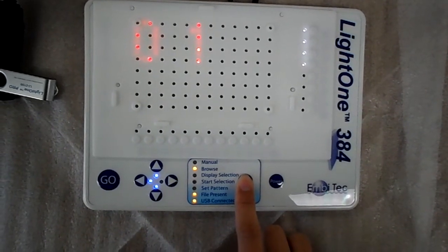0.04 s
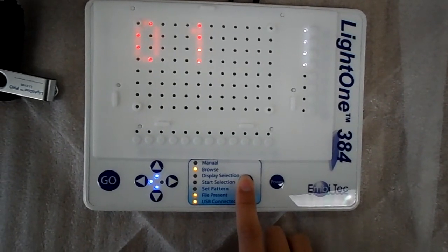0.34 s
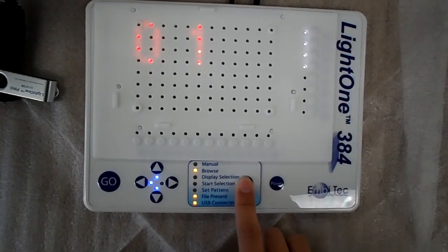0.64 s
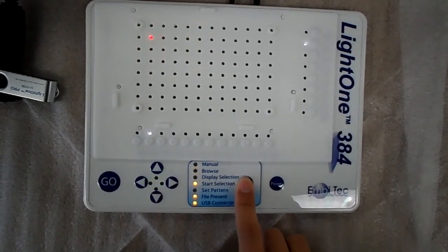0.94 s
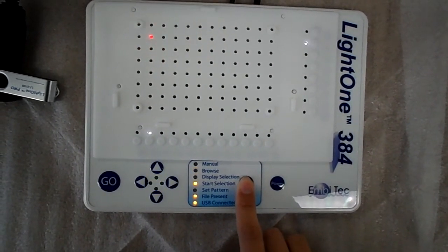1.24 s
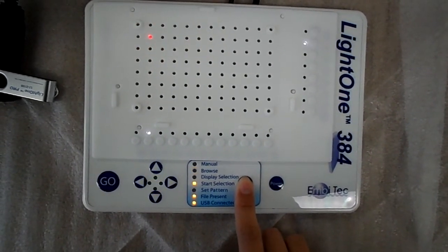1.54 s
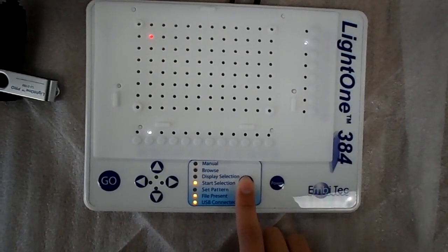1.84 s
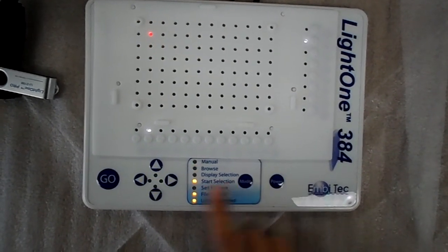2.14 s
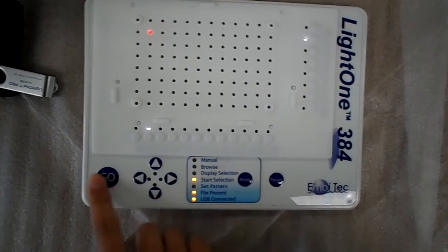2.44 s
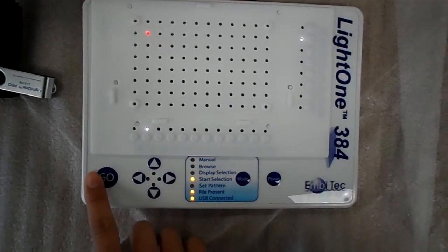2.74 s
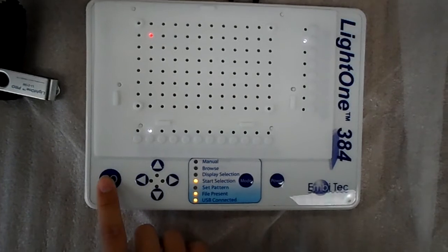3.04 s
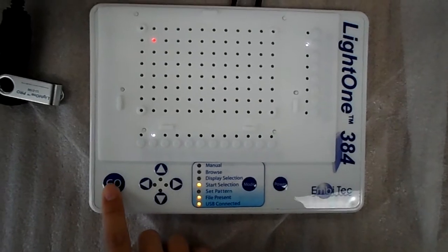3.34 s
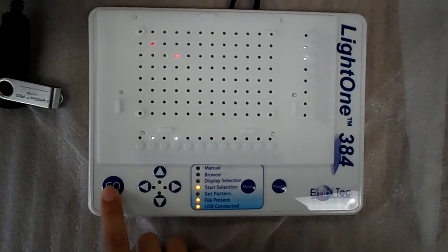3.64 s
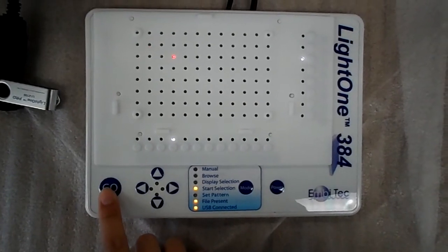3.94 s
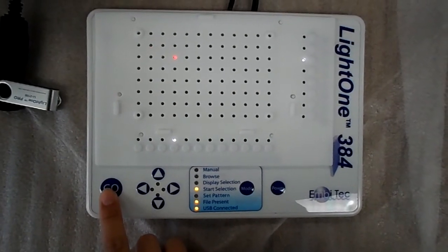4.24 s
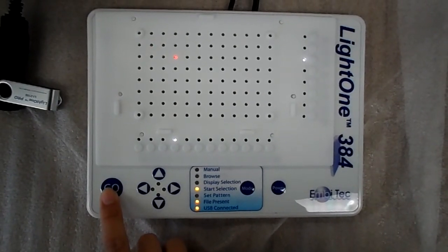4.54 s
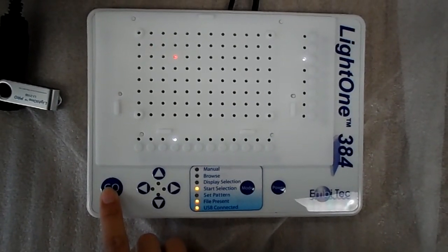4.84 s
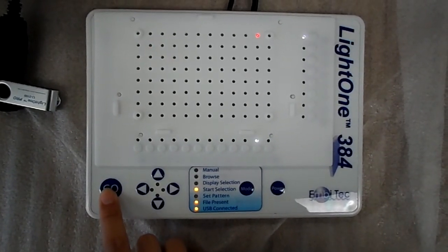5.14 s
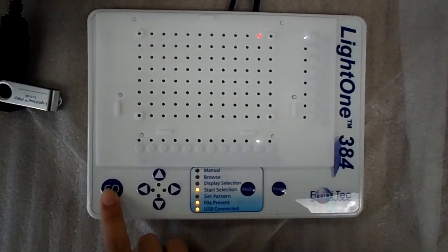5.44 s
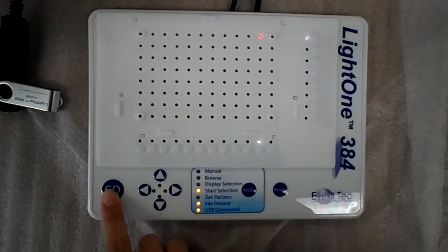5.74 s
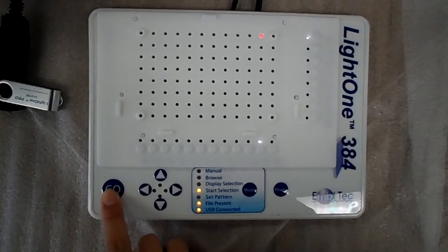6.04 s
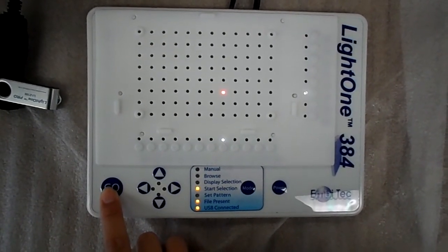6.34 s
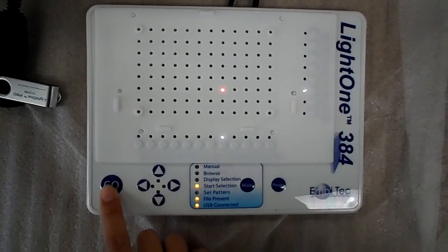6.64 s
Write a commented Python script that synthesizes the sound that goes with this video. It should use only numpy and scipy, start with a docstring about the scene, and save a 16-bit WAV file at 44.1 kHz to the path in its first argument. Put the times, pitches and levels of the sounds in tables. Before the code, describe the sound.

A small quiet room is heard throughout, with low rumble, electrical hum, soft hiss and a faint, thin electronic whine. Close to the microphone, a finger presses a button on a flat plastic device at about 1.1 seconds and releases it at 1.3, making two sharp, bright clicks that ring very briefly in the case. A few barely audible fingertip brushes come before and after. From about 2.3 to 2.8 seconds a sleeve slides over a soft sheet in one short, hissy rustle that swells and fades. The finger settles on the panel with a faint bump at 3.6 seconds. A second button then clicks down and up three times: at 3.8 and 4.05, at 5.1 and 5.4, and at 6.4 and 6.7 seconds. The clicks are crisp and nearly dry, each release slightly louder than its press.

```python
"""Two buttons in a quiet room

Close to the microphone, a finger works two snap-dome buttons on a flat plastic box lying on a soft sheet.
Each press and release sets the case ringing briefly; between the buttons a sleeve slides over the sheet.
The small room answers faintly. Behind it all lie low rumble, mains hum, microphone hiss
and a thin electronic whine."""
import sys
import numpy as np
from scipy import signal
from scipy.fft import rfft, irfft
from scipy.io import wavfile

SR = 44100
rng = np.random.default_rng(int(sys.argv[2]) if len(sys.argv) > 2 else 0)


def dump_mix(stems):
    """Bounce the given channels to the path in sys.argv[1] as a 16-bit WAV at rate SR."""
    frames = np.atleast_2d(stems).T  # one column per channel
    limited = np.clip(frames, -1, 1)  # hard clip at full scale
    pcm = np.round(limited * 32767).astype(np.int16)
    wavfile.write(sys.argv[1], SR, pcm)


N = 298557
TIME, HZ = np.arange(N) / SR, np.fft.rfftfreq(N, 1 / SR)
HISS_EDGE_HZ = 15800


def amp(db):
    """Decibels to gain."""
    return 10 ** (np.asarray(db) / 20)


def unit(x):
    """Scales to rms 1."""
    return x / np.sqrt(np.mean(x ** 2) + 1e-20)


def curve(points, hz):
    """Joins (frequency, value) points by lines on a log-frequency axis."""
    f, value = np.transpose(points)
    return np.interp(np.log(hz + 1), np.log(f + 1), value)


def add(mix, at_s, sound):
    """Adds a sound to the mix at the given time."""
    part = mix[round(at_s * SR):][:len(sound)]
    part += sound[:len(part)]


def decay(t, t60):
    """Envelope that falls 60 dB in t60 seconds."""
    return np.exp(-np.log(1000) * t / t60)


def colour(x, gain):
    """Filters by a gain for each frequency, then scales to rms 1."""
    return unit(irfft(rfft(x) * gain, N))


def noise(gain):
    """Coloured noise of rms 1."""
    return colour(rng.standard_normal(N), gain)


def drift(rate_hz):
    """Slow random wander of rms 1."""
    return noise(np.exp(-(HZ / rate_hz) ** 2))


def room_tone(floor_db=-55.5, waver_rad=0.48, waver_hz=1.07):
    """Room rumble and microphone hiss, with the slightly wavering hum of the building."""
    # rumble and hiss: (frequency [Hz], relative density [dB])
    floor_spectrum = [(7, -15.5), (13, 3), (22, -3.5), (32, 3.5), (52, -4), (75, -8.5), (92, -11),
                      (200, -16.5), (300, -18.5), (430, -23.5), (1000, -28), (2000, -31), (4500, -35),
                      (9400, -36.5), (11500, -40), (15700, -37)]
    # mains and machines: (frequency [Hz], rms level [dB])
    hum_lines = [(59.5, -67), (70, -62.5), (120, -72.5), (174, -76), (190, -79)]
    floor = amp(floor_db) * noise(amp(curve(floor_spectrum, HZ)) * (HZ < HISS_EDGE_HZ))
    hum = np.zeros(N)
    for hz, db in hum_lines:
        phase = 2 * np.pi * (hz * TIME + rng.random()) + waver_rad * drift(waver_hz)
        hum += np.sqrt(2) * amp(db) * np.sin(phase)
    return floor + hum


def whine(base_hz=797, blur_hz=70, bursts_per_s=30, fizz_db=-76, fizz_hz=9000, fizz_width_hz=3500):
    """Blurred overtones and fizz of the electronics, coming in quick regular bursts."""
    # lines of the whine: (multiple of the base pitch, rms level [dB])
    overtones = [(8, -87), (9, -85.5), (10, -81.5), (12, -87), (13, -83.5), (15, -93)]
    lines = sum(amp(db) * np.exp(-((HZ - k * base_hz) / blur_hz) ** 2 / 2) for k, db in overtones)
    tones = np.linalg.norm([amp(db) for _, db in overtones]) * noise(lines)
    fizz_band = np.exp(-((HZ - fizz_hz) / fizz_width_hz) ** 2 / 2) * (HZ < HISS_EDGE_HZ)
    fizz = amp(fizz_db) * noise(fizz_band)
    bursts = unit(1 + np.sin(2 * np.pi * bursts_per_s * TIME))
    return bursts * (tones + fizz)


def fingertip(brush_decay_s=0.024, bump_s=3.577, bump_db=-42.5):
    """Skin brushes the panel in short hisses and once settles on it with a soft bump."""
    # light touches: (time [s], gain [dB], rise [s], centre [Hz], width [Hz])
    brushes = [(.389, -55, .0018, 8400, 2800), (1.482, -57.5, 0.0035, 9800, 5000),
               (1.483, -61.5, 0.004, 3870, 900), (1.619, -54.5, 0.0052, 9200, 3500),
               (1.935, -59, .015, 9000, 3000)]
    # the case under the bump: (frequency [Hz], relative level [dB], t60 [s])
    bump_modes = [(342, 0, 0.053), (696, -10.5, .05)]
    out = np.zeros(N)
    for at_s, db, rise_s, centre_hz, width_hz in brushes:
        t = np.maximum(TIME - at_s, 0)
        hiss = noise(1 / (1 + (2 * (HZ - centre_hz) / width_hz) ** 2))
        out += amp(db) * (1 - np.exp(-t / rise_s)) * np.exp(-t / brush_decay_s) * hiss
    add(out, bump_s, amp(bump_db) * case_ring(bump_modes, rise_cycles=1.4))
    return out


def case_ring(modes, tilt_db_per_octave=0, rise_cycles=0.3):
    """One blow on the case: damped modes, neighbours swinging in opposite directions."""
    hz, db, t60 = np.transpose(modes)[:, :, None]
    # bending waves cross the panel faster at high pitch, so the treble arrives first
    arrival_s = 0.0002 * np.sqrt(1000 / hz)
    t = np.maximum(TIME[:4096] - arrival_s, 0)
    gain = amp(db + tilt_db_per_octave * np.log2(hz / 6000))
    sign = (-1) ** np.arange(len(hz))[:, None]
    envelope = decay(t, t60) * (1 - np.exp(-t * hz / rise_cycles))
    return (sign * gain * envelope * np.sin(2 * np.pi * hz * t)).sum(0)


def button(name, modes, clatter_db, clatter_t60, low_cut_hz, build_s=0.00049):
    """The dome flips in and out: each snap rings the modes and scatters into a short clatter."""
    # press and release in turn: (time [s], gain [dB], tilt [dB per octave], button)
    snaps = [(1.0673, -1.4, 1.5, "select"), (1.3001, 1, -0.5, "select"), (3.7831, -1, 0.0, "start"),
             (4.05, 1.6, 0, "start"), (5.0907, -1.2, 0, "start"), (5.3717, 0.6, -0.5, "start"),
             (6.3878, -2, -0.5, "start"), (6.6757, 0.9, -0.5, "start")]
    # dense clatter inside the hollow case: (frequency [Hz], relative density [dB])
    clatter_spectrum = [(150, 8), (700, 1), (2500, -2.5), (4500, 1), (10000, -4), (16000, 0)]
    # the microphone dulls the clicks above 11 kHz: (frequency [Hz], gain [dB])
    mic_rolloff = [(11200, 0), (11900, -9), (16000, -15)]
    rings, envelope = np.zeros((2, N))
    t = TIME[:4096]
    burst = np.minimum(t / build_s, 1) * decay(t, clatter_t60)
    for at_s, db, tilt, pressed in snaps:
        if pressed == name:
            add(rings, at_s, amp(db) * case_ring(modes, tilt))
            add(envelope, at_s, amp(db + clatter_db) * burst)
    # the stiffer the panel under the button, the less bass it passes on
    clatter = noise(amp(curve(clatter_spectrum, HZ)) * HZ / np.hypot(HZ, low_cut_hz))
    return irfft(rfft(rings + envelope * clatter) * amp(curve(mic_rolloff, HZ)), N)


def room_reflections(x, tail_db=-23, onset_s=0.01):
    """A few distinct reflections reach the microphone, with a weak diffuse tail whose bass lingers."""
    # off the desk and walls: (delay [s], gain [dB])
    echoes = [(.0097, -53), (0.0137, -24), (0.016, -48), (0.0238, -44), (0.023, -40.5), (.0282, -42),
              (0.0367, -34.5)]
    # the room's decay: (frequency [Hz], t60 [s])
    decay_times = [(300, 1), (3000, 0.14), (8000, 0.23), (14000, 0.27)]
    hz, t, spectra = signal.stft(rng.standard_normal(16384), SR, nperseg=256)
    spectra *= decay(t, curve(decay_times, hz)[:, None])
    _, tail = signal.istft(spectra, SR, nperseg=256)
    tail *= TIME[:len(tail)] > onset_s
    response = amp(tail_db) * tail / np.linalg.norm(tail)
    for delay_s, db in echoes:
        add(response, delay_s, amp([db]))
    return signal.fftconvolve(x, response)[:N]


def arm_stroke(t, dip_db, power, start_s=2.2744, speed_up_s=0.2, coast_db_per_s=61.5, surges_per_s=9.8):
    """Gain of a rub: the arm speeds up evenly, then slows as the cloth drags and gives in surges."""
    moving_s = t - start_s
    coasting_s = np.maximum(moving_s - speed_up_s, 0)
    speed = np.clip(moving_s / speed_up_s, 0, 1) * amp(-coast_db_per_s * coasting_s)
    drag = np.sin(np.pi * surges_per_s * coasting_s) ** 2
    return speed ** power * amp(-dip_db * drag)


def sleeve(hiss_db=-44, rub_db=-55.5, rub_lead_s=0.0079, catches_per_s=9000, spread_db=2, flutter_db=1.4):
    """Countless fibres catch and slip on the sheet; the pressure flutters as the arm moves."""
    # hiss of the fibres: (frequency [Hz], relative density [dB])
    fibre_spectrum = [(1500, -33), (2500, -7), (3000, -8), (3700, 1), (4400, -7), (5200, 1), (6200, -6),
                      (7300, 0), (8000, -0.5), (9600, 3.5), (11000, -4), (13000, -12), (15500, -24),
                      (16200, -45)]
    # lower rub of the cloth: (frequency [Hz], relative density [dB])
    rub_spectrum = [(150, -14), (350, -7), (800, -1.5), (1400, 3), (2400, 0.5), (3200, -10), (4500, -36)]
    sizes = amp(spread_db * np.minimum(rng.exponential(1, N), 4)) * rng.choice([-1, 1], N)
    catches = sizes * (rng.random(N) < catches_per_s / SR)
    hiss = colour(catches, amp(curve(fibre_spectrum, HZ)))
    hiss *= amp(hiss_db) * arm_stroke(TIME, dip_db=5, power=1.33)
    rub = noise(amp(curve(rub_spectrum, HZ)))
    rub *= amp(rub_db) * arm_stroke(TIME + rub_lead_s, dip_db=8, power=1.54)
    return (hiss + rub) * amp(flutter_db * drift(rate_hz=50))


def scene():
    """Buttons and hand close to a single microphone, in a small quiet room."""
    # dome and case struck at the first button: (frequency [Hz], relative level [dB], t60 [s])
    select_modes = [(345, -49.4, 0.0289), (643, -46.1, 0.0374), (820, -43.4, 0.0261), (1264, -39.4, 0.0246),
                    (1454, -47.3, 0.0271), (1982, -31.3, 0.0064), (2398, -32.4, 0.0159),
                    (2829, -36.1, 0.0063), (3239, -43.6, 0.0183), (3942, -25.3, 0.0026),
                    (4165, -36.1, 0.0168), (4511, -32.3, 0.0109), (5332, -21.2, 0.0025),
                    (5367, -30.2, 0.0127), (6304, -33.7, 0.0021), (6839, -40.3, 0.0122),
                    (7162, -36.3, 0.0116), (8126, -22.6, 0.0061), (9340, -37.4, 0.0116),
                    (10218, -22.6, 0.0045), (10664, -24.7, 0.0047), (12521, -29.5, 0.0037),
                    (13817, -36.7, 0.0097), (15201, -36.0, 0.005)]
    # and at the second: (frequency [Hz], relative level [dB], t60 [s])
    start_modes = [(353, -52.2, 0.0519), (685, -48.5, 0.0368), (920, -47.5, 0.0319), (1244, -49.1, 0.0282),
                   (1519, -45.9, 0.0262), (2527, -41.5, 0.021), (2969, -26.8, 0.0009),
                   (3093, -47.7, 0.0184), (3689, -31.6, 0.0058), (4485, -15.1, 0.0037),
                   (4463, -27.4, 0.0119), (5499, -22.4, 0.0066), (6129, -24.5, 0.0013),
                   (6071, -22.7, 0.0041), (7584, -25.6, 0.0049), (8329, -25.6, 0.0048),
                   (9235, -17.8, 0.0023), (8657, -37.6, 0.0116), (9724, -23.5, 0.0075),
                   (10829, -27.9, 0.0088), (11383, -21.4, 0.0007), (11109, -25.2, 0.0063),
                   (12747, -16.6, 0.0014), (15189, -33.9, 0.0048)]
    select = button("select", select_modes, clatter_db=-29.5, clatter_t60=0.019, low_cut_hz=200)
    start = button("start", start_modes, clatter_db=-31.5, clatter_t60=0.025, low_cut_hz=1600)
    near = select + start + fingertip() + sleeve()
    return (near + room_reflections(near) + room_tone() + whine())[None]


def record(dry):
    """The recorder cuts the treble above 16.6 kHz."""
    lowpass = signal.firwin(255, 16600, window=("kaiser", 9), fs=SR)
    return signal.oaconvolve(dry, lowpass[None], "same")


dry = scene()
out = record(dry)
dump_mix(out)
```